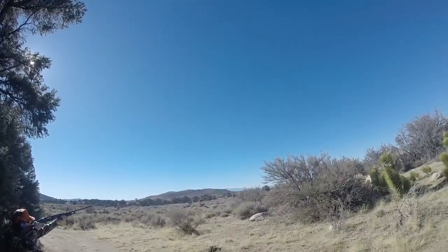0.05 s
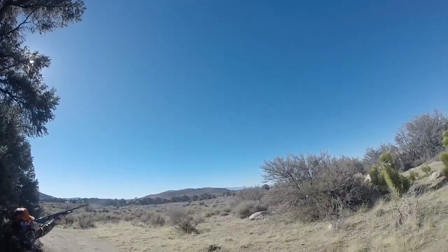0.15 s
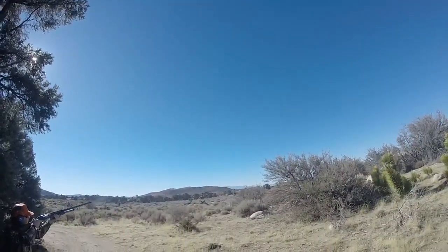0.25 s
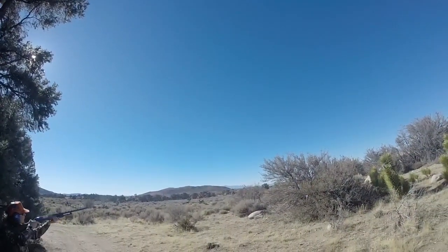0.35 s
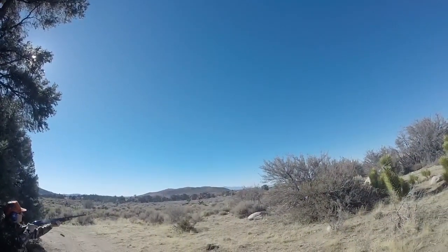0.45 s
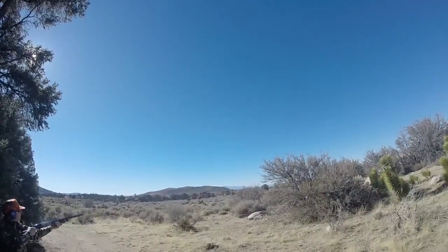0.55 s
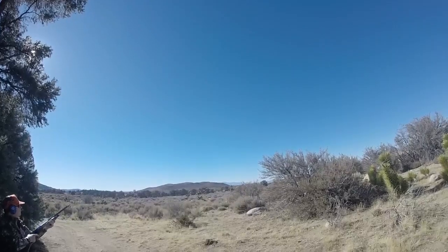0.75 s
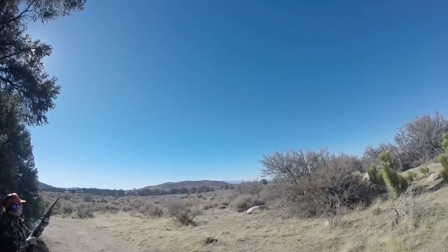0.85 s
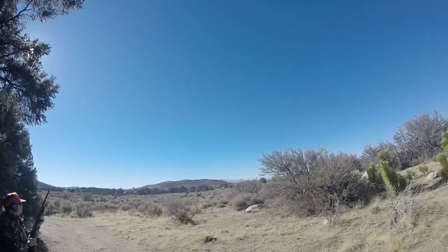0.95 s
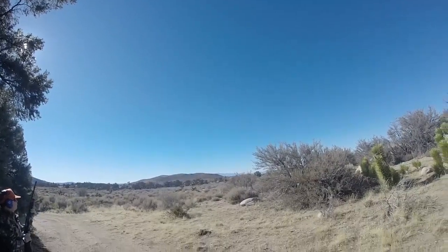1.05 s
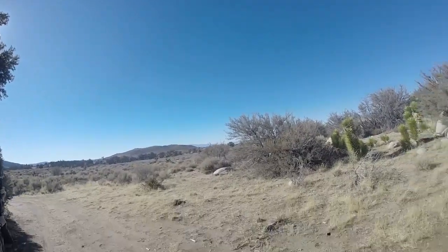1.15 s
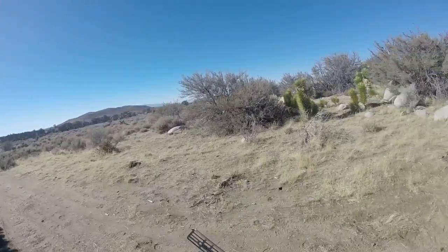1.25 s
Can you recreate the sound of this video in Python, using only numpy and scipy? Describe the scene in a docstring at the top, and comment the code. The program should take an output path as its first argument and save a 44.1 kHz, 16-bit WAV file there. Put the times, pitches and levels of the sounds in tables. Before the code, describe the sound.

One loud shotgun shot outdoors with a short scattered echo, followed by quick clacks of the gun's action

```python
"""Open, dry hill country, one microphone in a body-worn camera a few metres from a shotgun.
Light wind and handling rustle, as shaped noise, come first; at 0.24 s a single shot, a pressure pulse with
ringing modes, shakes the camera housing and overloads the input. Brush, trees, rocks and far slopes return
decaying noise; from 0.47 s the gun's action clacks and small parts ring in narrow bands.
The recorder's gain control ducks everything at the blast, and the wind slowly returns beneath."""
import sys
import numpy as np
from scipy import signal
from scipy.fft import irfft
from scipy.io import wavfile
from scipy.ndimage import uniform_filter1d

SR = 44100
rng = np.random.default_rng(int(sys.argv[2]) if len(sys.argv) > 2 else 0)


def materialize(psi):
    """Save the field psi as 16-bit PCM at rate SR to the path in sys.argv[1].

    A 1-D psi becomes a single channel; in a 2-D psi each row is a channel.
    """
    bounded = np.clip(np.atleast_2d(psi).T, -1, 1)
    quanta = np.round(bounded * 32767).astype(np.int16)
    wavfile.write(sys.argv[1], SR, quanta)


N = 57330  # samples, 1.3 s
SHOT_S = 0.2384  # when the direct blast reaches the microphone


def amp(db):
    """Decibels to amplitude gain."""
    return 10 ** (np.asarray(db) / 20)


def unit_rms(x):
    """Scales a signal to rms 1."""
    return x / np.sqrt(np.mean(x ** 2) + 1e-20)


def read_curve(points, hz):
    """Reads a table of values against frequency on a logarithmic frequency axis."""
    f, value = np.transpose(points)
    return np.interp(np.log(hz + 1), np.log(f + 1), value)


def time_since(start_s):
    """Seconds elapsed since start_s, zero before it."""
    return np.maximum(np.arange(N) / SR - start_s, 0)


def shaped_noise(spectrum, tilt_db=0):
    """Random-phase noise of rms 1 with a given spectrum, tilted in dB per octave from 800 to 9000 Hz."""
    hz = np.fft.rfftfreq(N, 1 / SR)
    octaves = np.log2(np.clip(hz, 800, 9000))
    gain = amp(read_curve(spectrum, hz) + tilt_db * octaves)
    phase = np.exp(2j * np.pi * rng.random(len(hz)))
    return unit_rms(irfft(gain * phase, N))


# paths from muzzle to microphone: direct, then off the ground and things nearby
# (delay t/s, level/dB before BLAST_DB)
BLAST_PATHS = [(0, 1.5), (.000708, 9.5), (.0018, -2), (.00585, -10)]
# spectrum of the pressure pulse (f/Hz, level/dB)
PULSE_SPECTRUM = [(40, -28.5), (90, -1.7), (170, 7.5), (380, 13.5), (700, 14), (1500, 1.5), (3300, 9),
                  (5000, 14), (7000, -5), (8500, -1.5), (11000, -2.4), (16000, -21)]
# modes of the camera housing (f/Hz, level/dB before paths and BLAST_DB, t60/s, polarity)
HOUSING_MODES = [(1300, -22.5, 0.0063, 1), (1778, -12, 0.0094, 1), (2402, -10, 0.013, -1),
                 (3288, -6, 0.012, 1), (3530, -11.5, 0.0097, -1), (4145, -19, .0105, -1),
                 (6258, -12.5, .014, 1), (6540, -29, 0.0083, 1)]
BLAST_DB = 12
GAS_DB, GAS_T60_S, GAS_TILT_DB = -7, 0.02, 7  # tilt in dB per octave


def blast():
    """A sharp pressure pulse rings the housing, arriving by a few short paths; muzzle gas hisses briefly."""
    hz, t = np.fft.fftfreq(N, 1 / SR), time_since(0)
    # minimum phase: the pulse's energy arrives as early as its spectrum allows
    log_gain = np.log(amp(read_curve(PULSE_SPECTRUM, abs(hz))))
    pulse = np.fft.ifft(np.exp(np.conj(signal.hilbert(log_gain)))).real
    ring = sum(np.sign(polarity) * amp(db - 60 * t / t60) * np.sin(2 * np.pi * f * t)
               for f, db, t60, polarity in HOUSING_MODES)
    # each path is a delay, applied as a phase turn
    paths = sum(amp(db) * np.exp(-2j * np.pi * hz * (SHOT_S + delay)) for delay, db in BLAST_PATHS)
    arrivals = np.fft.ifft(np.fft.fft(pulse + ring) * paths).real
    age = time_since(SHOT_S)
    gas_level = (age > 0) * amp(GAS_DB - 60 * age / GAS_T60_S)
    gas = gas_level * shaped_noise(SCATTER_SPECTRUM, GAS_TILT_DB)
    return gas - amp(BLAST_DB) * arrivals  # the blast enters inverted


# sound scattered back by brush and ground, also the base of gas and echoes (f/Hz, level/dB per Hz)
SCATTER_SPECTRUM = [(60, -27.5), (150, -22), (340, -17), (480, -22.5), (900, -20.5), (1170, -10.5),
                    (1400, -14.5), (1700, -7), (2050, -4.5), (2300, -10.5), (3050, 0), (3600, 0),
                    (4400, -14), (5000, -15), (6300, -12.5), (7500, -22), (11000, -28), (14500, -37),
                    (16000, -50)]
# how long each band of the scatter lasts (f/Hz, t60/s)
SCATTER_DECAY = [(150, 0.59), (500, .4), (1200, .33), (1800, 0.32), (3200, 0.36), (5000, 0.26),
                 (8000, 0.19), (14000, .3)]
SCATTER_DB, SCATTER_RISE_S = -10.5, 0.0023
PATCHY_DB = 2.5  # rms unevenness of the clumps


def scatter():
    """Countless small reflections from brush and ground, in uneven clumps, each band dying at its own speed."""
    hz, t, bands = signal.stft(shaped_noise(SCATTER_SPECTRUM), SR, nperseg=256, noverlap=192)
    clumps = unit_rms(uniform_filter1d(rng.standard_normal(len(t)), size=4))
    fall_db = 60 * np.maximum(t - SHOT_S, 0) / read_curve(SCATTER_DECAY, hz)[:, None]
    bands = bands * amp(PATCHY_DB * clumps - fall_db)
    tail = signal.istft(bands, SR, nperseg=256, noverlap=192)[1][:N]
    rise = 1 - np.exp(-time_since(SHOT_S) / SCATTER_RISE_S)
    return amp(SCATTER_DB) * tail * rise


# distinct echoes from trees and rocks (centre t/s, level/dB, spread t/s, treble tilt/dB per octave)
TREE_ROCK_ECHOES = [(0.257, -18.5, .005, 0), (.288, -20, 0.0024, 0.5), (.292, -22, 0.0025, -9),
                    (0.336, -32, 0.016, -7), (0.3542, -28, 0.003, 2), (.410, -57, 0.0013, -4),
                    (.692, -55, 0.0025, -5.5)]
# long roll from the far slopes (f/Hz, level/dB per Hz)
ROLL_SPECTRUM = [(200, -16), (1300, -24.5), (1750, -1.5), (2300, -15.5), (3100, -0.5), (3600, -6.5),
                 (4400, -16), (6500, -17.5), (9000, -38)]
ROLL_DB, ROLL_T60_S = -35, 0.88


def hills():
    """Bell-shaped noise bursts smear the echoes of trees and rocks; a faint roll decays from far slopes."""
    t, age = time_since(0), time_since(SHOT_S)
    echoes = sum(amp(db) * np.exp(-.5 * ((t - centre) / spread) ** 2) * shaped_noise(SCATTER_SPECTRUM, tilt)
                 for centre, db, spread, tilt in TREE_ROCK_ECHOES)
    rise = 1 - np.exp(-age / SCATTER_RISE_S)
    roll = amp(ROLL_DB - 60 * age / ROLL_T60_S) * rise * shaped_noise(ROLL_SPECTRUM)
    return echoes + roll


# clacks of the action (t/s, level/dB, t60/s, treble tilt/dB per octave)
ACTION_CLACKS = [(0.472, -27, 0.011, -0.5), (0.53, -36, .035, 2), (.5393, -28, 0.019, 0.5),
                 (.546, -27, 0.015, 2.5), (0.958, -49.5, 0.024, 3)]
# what the gun's metal rings with (f/Hz, level/dB per Hz)
STEEL_SPECTRUM = [(300, -27), (1200, -19), (1750, 2.5), (2300, -14.5), (3100, 6.5), (3700, 0), (4800, -9.5),
                  (6000, -9), (7200, -17.5), (8500, -22), (12500, -27), (14500, -45)]
CLACK_RISE_S = 0.001141
CLACK_SCATTER_DB, CLACK_SCATTER_T60_S = -19.5, 0.2  # level relative to the ring


def clack(start_s, db, t60, tilt_db):
    """Metal parts meet: a short dense ring with a little scatter behind it."""
    t = time_since(start_s)
    decay = amp(-60 * t / t60) + amp(CLACK_SCATTER_DB - 60 * t / CLACK_SCATTER_T60_S)
    rise = np.minimum(t / CLACK_RISE_S, 1)
    return amp(db) * rise * decay * shaped_noise(STEEL_SPECTRUM, tilt_db)


# small parts ringing as the action shuts and the gun is raised (t/s, level/dB, t60/s, f/Hz)
SMALL_PART_TICKS = [(0.5452, -21, 0.011, 6940), (.959, -56, .022, 3570), (0.9668, -57, 0.017, 3070),
                    (1.022, -55.5, .04, 3750)]
TICK_WIDTH_HZ, TICK_RISE_S = 430, 0.0023


def tick(start_s, db, t60, hz):
    """A small fitting rings in one narrow band: noise through two resonances, the second twice as wide."""
    t = time_since(start_s)
    ring = rng.standard_normal(N)
    for width in (TICK_WIDTH_HZ, 2 * TICK_WIDTH_HZ):
        ring = signal.lfilter(*signal.iirpeak(hz, hz / width, fs=SR), ring)
    return amp(db - 60 * t / t60) * np.minimum(t / TICK_RISE_S, 1) * unit_rms(ring)


# wind and handling rustle (f/Hz, level/dB per Hz)
AIR_SPECTRUM = [(20, -2.5), (55, -5), (110, -7), (280, -11), (700, -17), (1800, -22), (2700, -24),
                (6000, -32.5), (10000, -37.5), (13500, -42), (15500, -51)]
# strength of that air (t/s, level/dB)
AIR_STRENGTH = [(0, -58), (.13, -58), (.22, -57.5), (.65, -59), (.95, -57.5), (1.15, -57), (1.3, -57.5)]
# buffeting climbs throughout, aimed at BUFFET_DB at BUFFET_FULL_S, just past the end
BUFFET_DB, BUFFET_FULL_S, BUFFET_RISE_DB_PER_S = -60.5, 1.4, 22.5
BUFFET_HZ = 400  # top of the buffeting band


def wind():
    """A nearly steady rush of air, with low buffeting noise that grows as the camera turns."""
    t = time_since(0)
    rush = amp(np.interp(t, *np.transpose(AIR_STRENGTH))) * shaped_noise(AIR_SPECTRUM)
    band = signal.butter(1, [BUFFET_HZ / 10, BUFFET_HZ], "bandpass", fs=SR, output="sos")
    low = signal.sosfilt(band, rng.standard_normal(N))
    low = signal.sosfilt(signal.butter(1, 2 * BUFFET_HZ, fs=SR, output="sos"), low)
    buffet_db = BUFFET_DB + BUFFET_RISE_DB_PER_S * np.minimum(t - BUFFET_FULL_S, 0)
    return rush + unit_rms(low) * amp(buffet_db)


# wind at the microphone port (f/Hz, level/dB per Hz)
RUMBLE_SPECTRUM = [(12, -10), (28, -1), (55, -1), (90, -14.5), (200, -30.5), (1000, -70)]
RUMBLE_DB, RUMBLE_SWELL_DB = -55, 3  # swell is rms


def rumble():
    """Lumpy low wind at the microphone port: low noise whose level wanders at random."""
    swell = unit_rms(uniform_filter1d(rng.standard_normal(N), size=5000))
    return amp(RUMBLE_DB + RUMBLE_SWELL_DB * swell) * shaped_noise(RUMBLE_SPECTRUM)


def scene():
    """The shot, its echoes, the action and the wind summed at one microphone."""
    action = sum(clack(*row) for row in ACTION_CLACKS) + sum(tick(*row) for row in SMALL_PART_TICKS)
    return (blast() + scatter() + hills() + action + wind() + rumble())[None]


THRESHOLD_DB, RECOVERY_DB_PER_S = -2.5, 12
LOOK_AHEAD = 200  # samples by which the gain drop leads the sound
SATURATION, FULL_SCALE = 0.92, 0.97  # soft and hard amplitude limits
LOW_CUT_HZ, SOFT_TOP_HZ, EDGE_HZ = 100, 11800, 16200


def record(dry):
    """Gain drops at the blast and recovers slowly; peaks saturate; then tone filters and the band limit."""
    power_db = 10 * np.log10(abs(uniform_filter1d(dry[0] ** 2, size=128)) + 1e-12)
    power_db = np.pad(power_db, (0, LOOK_AHEAD), "edge")[LOOK_AHEAD:]
    # hold each peak of power and let it fall at the recovery rate
    fall = time_since(0) * RECOVERY_DB_PER_S
    held_db = np.maximum.accumulate(power_db + fall) - fall
    over_db = np.maximum(held_db - THRESHOLD_DB, 0)
    sound = SATURATION * np.tanh(dry / amp(over_db) / SATURATION)
    sound = signal.lfilter(*signal.butter(1, LOW_CUT_HZ, "highpass", fs=SR), sound)
    sound = signal.lfilter(*signal.butter(3, SOFT_TOP_HZ, fs=SR), sound)
    sound = np.clip(sound, -FULL_SCALE, FULL_SCALE)
    band_limit = signal.firwin(255, EDGE_HZ, window=("kaiser", 9), fs=SR)
    return signal.oaconvolve(sound, band_limit[None], "same")


dry = scene()
out = record(dry)
materialize(out)
```